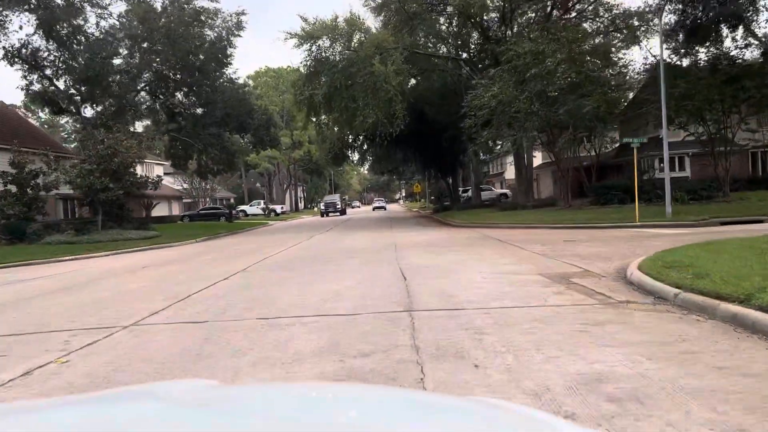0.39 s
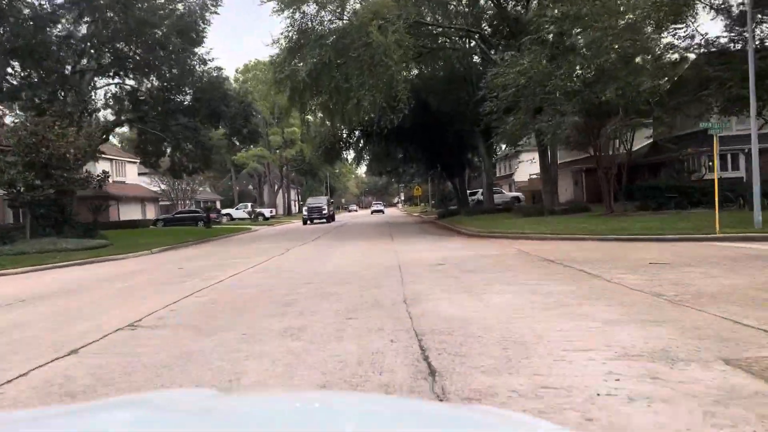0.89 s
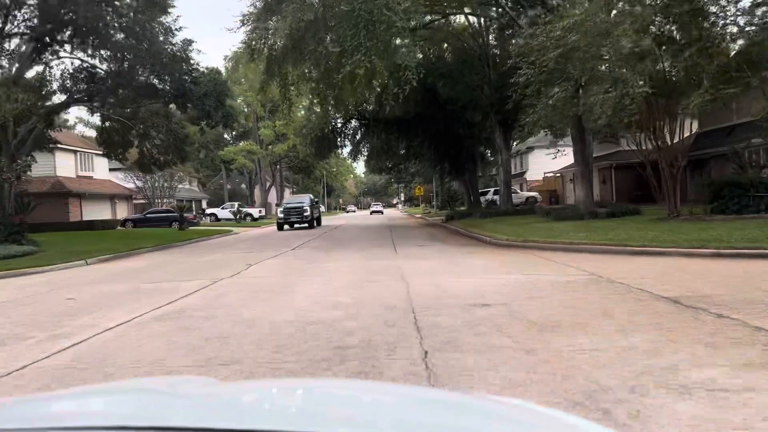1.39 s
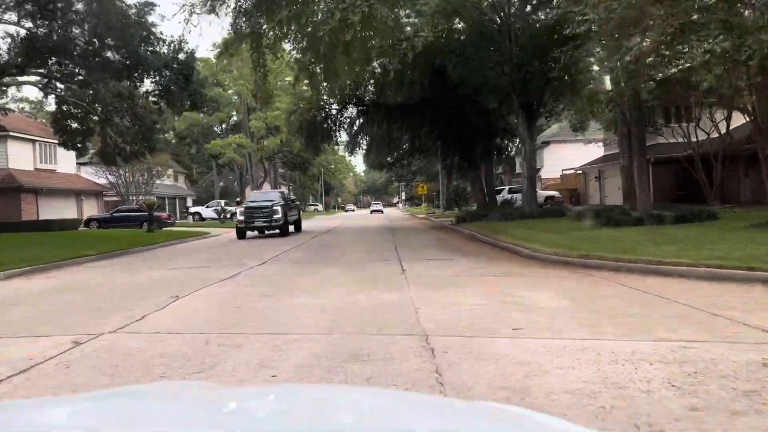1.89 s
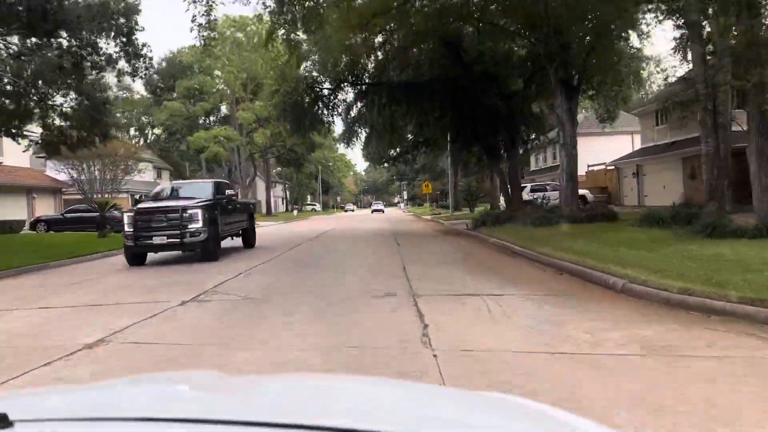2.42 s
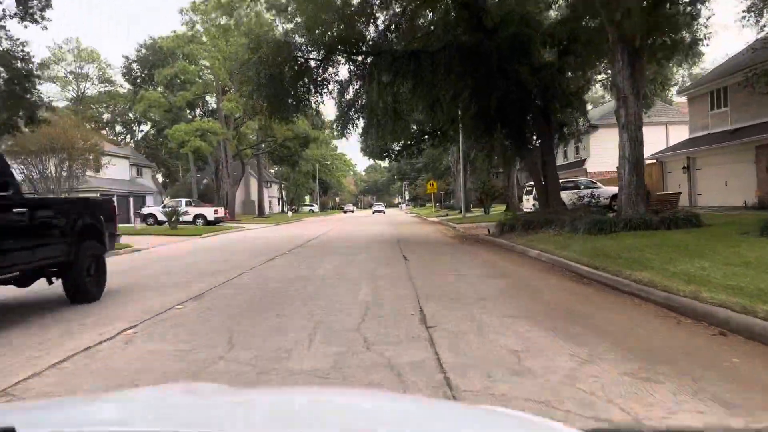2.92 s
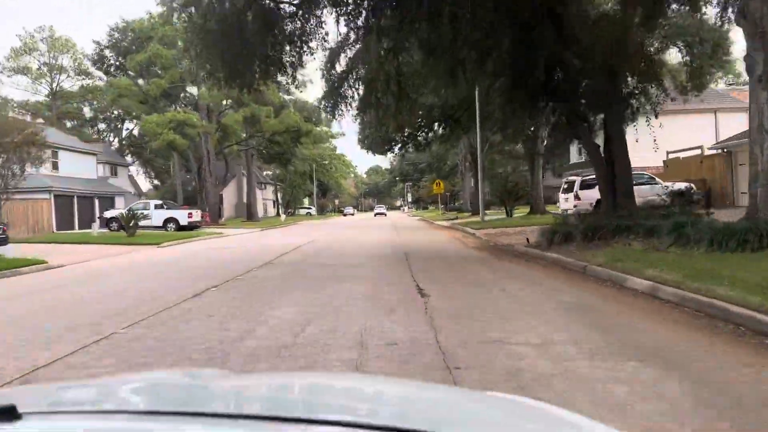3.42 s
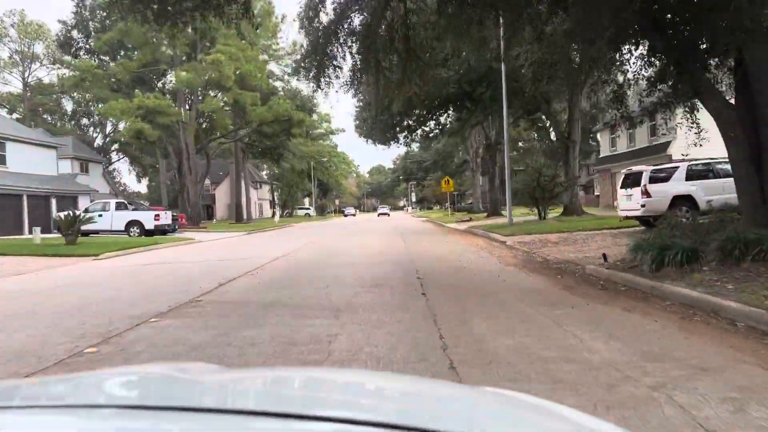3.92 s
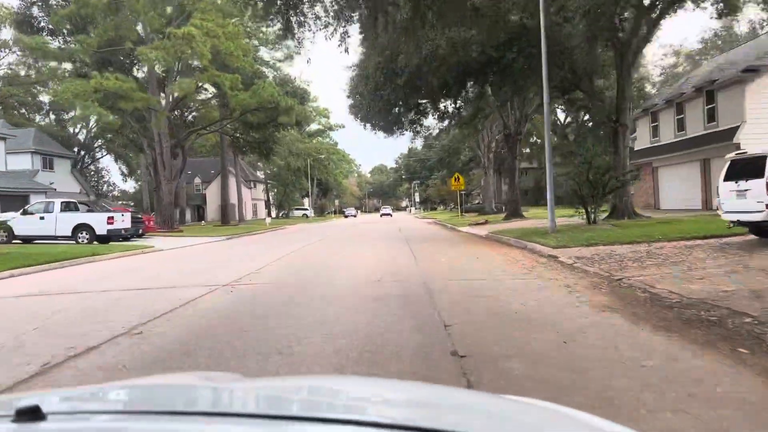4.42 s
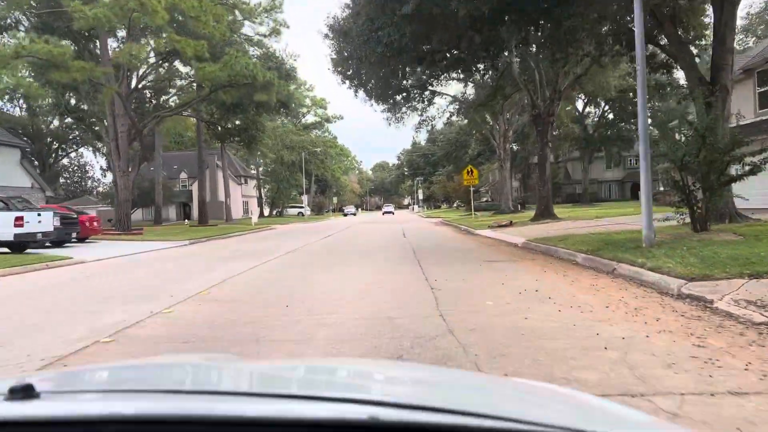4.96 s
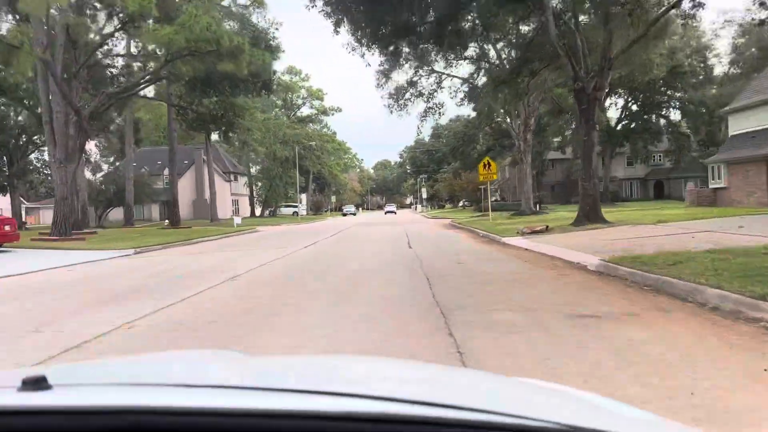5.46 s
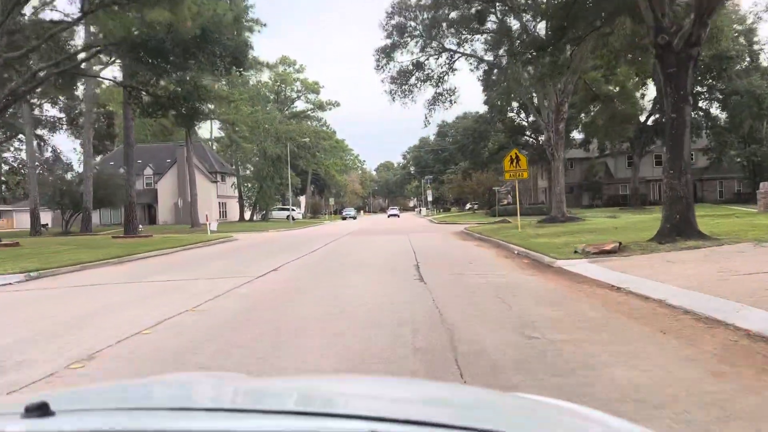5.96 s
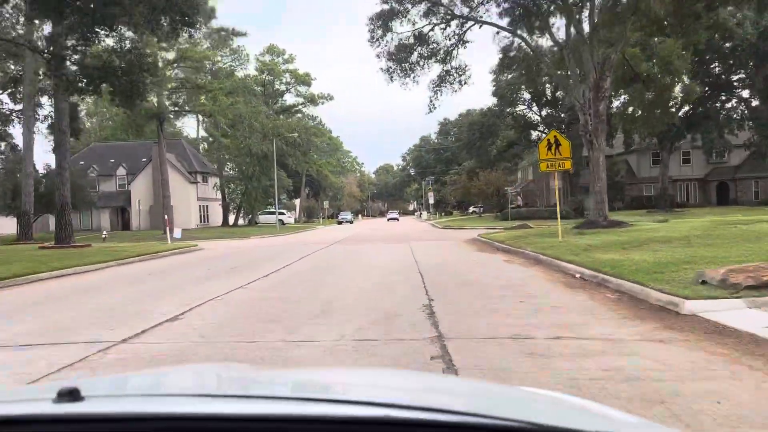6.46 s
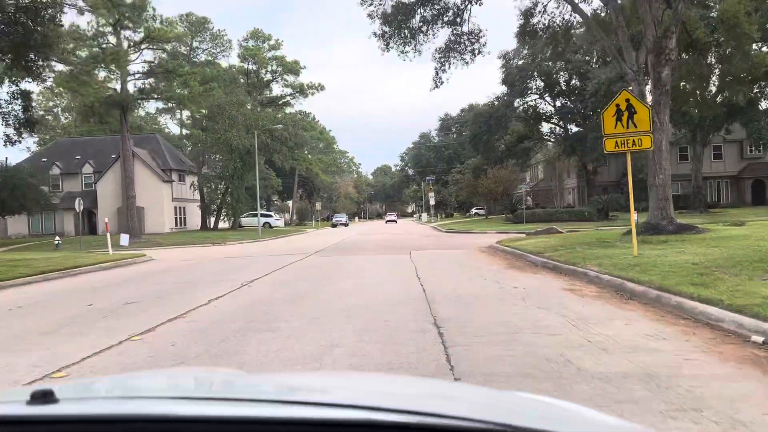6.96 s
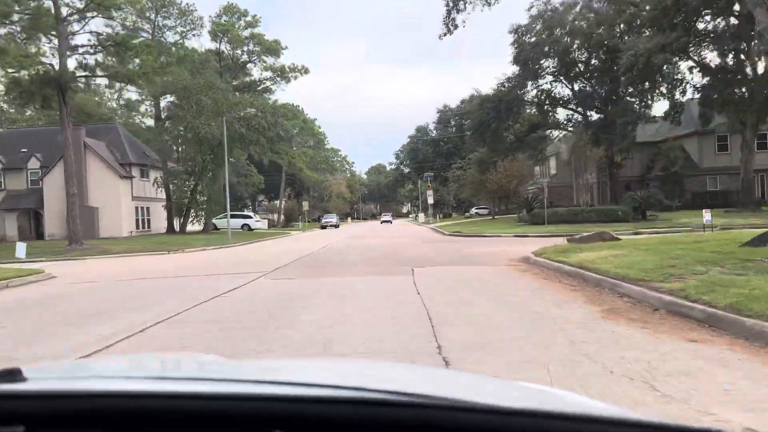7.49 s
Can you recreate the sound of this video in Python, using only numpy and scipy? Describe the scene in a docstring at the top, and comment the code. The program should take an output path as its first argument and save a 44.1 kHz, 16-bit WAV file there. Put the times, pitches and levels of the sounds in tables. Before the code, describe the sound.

A close cabin microphone hears a bass-heavy engine pull, then quieten and slide down as the driver changes up. Soft rubbing from the gear linkage fills the gap. The engine takes load again at a lower pitch, wobbling briefly, and gradually rises while gears whine more clearly. Road rumble, metallic buzz and breathy hiss continue, with occasional soft tyre thumps and a sharp trim tick at the end.

```python
"""Inside a small old car, shifting up

An air-cooled four behind the seats pulls, the driver shifts up, revs fall and climb again.
Firing tones boom in the cabin over filtered-noise rumble, roar and hiss; roar and hiss fade off throttle.
Gears whine on and off as unsteady sines, the linkage scuffs, tinware buzzes in shaky notes.
The suspension thumps over slab joints and trim ticks, both as decaying sines.
Two close microphone ports hear the bass nearly alike and the treble less so."""
import sys
import numpy as np
from scipy import signal
from scipy.fft import rfft, irfft
from scipy.io import wavfile
from scipy.ndimage import map_coordinates

SR = 44100
rng = np.random.default_rng(int(sys.argv[2]) if len(sys.argv) > 2 else 0)


def transcribe(signal):
    """Save signal, clipped to [-1, 1], as a 16-bit WAV file at the path in sys.argv[1]."""
    frames = np.atleast_2d(signal).T
    limited = np.clip(frames, -1, 1)
    pcm = np.round(limited * 32767).astype(np.int16)
    wavfile.write(sys.argv[1], SR, pcm)


def linear_from_db(decibels):
    """Turn decibels (scalar or array-like) into linear amplitude factors; 0 gives 1."""
    return 10 ** (np.asarray(decibels, float) / 20)


N = 335160
TIME = np.arange(N) / SR  # s
FREQ = np.maximum(np.arange(N // 2 + 1) * SR / N, 1)  # Hz, bins of the whole-length spectrum
LEFT_RIGHT = np.array([[.5], [-.5]])  # splits a left-minus-right difference between the ports


def curves(table):
    """Columns of a table, joined over time."""
    s, *columns = np.transpose(table)
    return [np.interp(TIME, s, c) for c in columns]


def over_hz(table, hz):
    """Columns of a table, joined over log frequency."""
    f, *columns = np.transpose(table)
    return [np.interp(np.log(hz), np.log(f), c) for c in columns]


def walk(rate):
    """Smooth random wander, spread near 1, through `rate` random knots per second."""
    knots = rng.standard_normal(int(N / SR * rate) + 4)
    # a cubic curve every 64 samples, straight lines between
    coarse = map_coordinates(knots, [np.arange(0, N + 64, 64) / SR * rate], order=3)
    return np.interp(np.arange(N) / 64, np.arange(len(coarse)), coarse)


def tone(cycles):
    """A sine of rms 1 from a running count of cycles, at a random phase."""
    return np.sqrt(2) * np.sin(2 * np.pi * (cycles + rng.random()))


def ports(shared, apart=0):
    """Two ports: a shared spectrum arrives shifted and tilted, mixed with what each port hears alone."""
    # How alike the two microphone ports hear. Each row: frequency in Hz, likeness 0-1,
    # left lead in rad, left minus right in dB.
    port_rows = [(30, .97, .45, -1.6), (62, .999, .58, -1), (130, .995, .32, .7), (250, .98, .38, .8),
                 (380, .85, .3, .5), (600, .75, 1.1, 1), (800, .8, 1.8, 1.2), (1050, .7, 1.5, 1),
                 (1400, .5, 2.3, -1.2), (2200, .45, 2.3, 0), (4000, .4, 1.2, 4), (9500, .5, .8, 6)]
    like, lead, tilt_db = over_hz(port_rows, FREQ)
    like = np.clip(like, 0, 1)
    if np.isscalar(apart):
        like = 1  # nothing heard alone
    together = np.sqrt(like) * np.exp(1j * LEFT_RIGHT * lead) * shared
    return linear_from_db(LEFT_RIGHT * tilt_db) * (together + np.sqrt(1 - like) * apart)


def noise(colour, flicker_db, flicker_rate, swell_db, ripple_db):
    """Stereo noise of rms 1 in half-octave bands that swell together and flicker alone."""
    # Panels that ring with the noise. Each row: frequency in Hz, width in Hz, boost in dB.
    panels = [(530, 60, 2.5), (690, 50, 2.5), (780, 55, 3.5), (1010, 100, 4), (1280, 130, 4.5),
              (2750, 150, 3), (4350, 130, 4)]
    db = over_hz(colour, FREQ)[0]
    db = db + sum(g / (1 + ((FREQ - f) / (w / 2)) ** 2) for f, w, g in panels)
    # countless small sheet-metal modes leave a fine ripple, a peak about every 60 Hz
    ripple = walk(SR / N * SR / 2 / 30)[:N:2]
    db = db + ripple_db * ripple[np.minimum(np.arange(len(FREQ)), N // 2 - 1)]
    white = rfft(rng.standard_normal((3, N)))  # one shared, one for each port alone
    spectrum = linear_from_db(db) * ports(white[0], white[1:])
    out, swell = 0, walk(2 * flicker_rate)
    loudest_db, octave = max(c[1] for c in colour), np.log2(FREQ)
    for centre in np.arange(4, 14, .5):
        if np.interp(centre, octave, db) > loudest_db - 45:  # skip inaudible bands
            share = np.cos(np.pi * np.clip(octave - centre, -.5, .5)) ** 2
            gain = linear_from_db(flicker_db * walk(flicker_rate) + swell_db * swell)
            out = out + gain * irfft(share * spectrum, N)
    return out / np.sqrt(np.mean(np.mean(out, axis=0) ** 2))


def engine(hz, load_db):
    """Firing tone and its multiples ring the cabin; uneven cylinders add orders that wander in strength."""
    # Cabin boom on the firing tone and its second and third multiples.
    # Each row: frequency in Hz, level in dB before the load and source trims.
    boom = [(53, -22), (57, -13.5), (63, -11.5), (70, -13.5), (80.5, -19.5), (87, -13), (94, -13),
            (108, -26), (124, -26.5), (137, -20), (160, -20.5), (173, -22.5), (184, -18.5), (196, -17),
            (210, -22.5), (250, -24), (265, -33.5), (285, -26.5)]
    # Uneven cylinders and exhaust runs. Each row: multiple of the firing rate,
    # level in dB before load and cabin.
    orders = [(0.499, -34.5), (0.752, -30.5), (1.25, -28), (1.5, -40), (1.75, -31.5), (2.25, -43),
              (2.5, -40.5), (2.75, -27.5), (3.25, -35), (3.5, -40), (3.75, -36), (4, -31.5), (5, -45)]
    # How the cabin passes those orders. Each row: frequency in Hz, gain in dB.
    cabin = [(30, -13), (60, -4.5), (115, 3), (150, -1.5), (190, 3.5), (250, 2), (280, -12.5), (305, 3),
             (335, -1.5), (375, -4), (430, -14)]
    # The driveline shudders as the clutch bites. One row: start in seconds, shudder rate in Hz,
    # swing of the firing rate in Hz, swing of the firing tone in dB, decay time constant in seconds.
    shudder_row = (1.97, 4.6, 3.5, 3.0, .55)
    first_db, second_db, third_db = (over_hz(boom, order * hz)[0] for order in (1, 2, 3))
    # dB for each dB of load: uneven orders and overtones thin out off throttle
    uneven_db, thin_db = 0.37 * load_db, .2 * load_db
    s, shudder_hz, swing_hz, swing_db, fade = shudder_row
    age = np.maximum(TIME - s, 0)
    shudder = np.sin(2 * np.pi * shudder_hz * age) * np.exp(-age / fade)
    hz, first_db = hz + swing_hz * shudder, first_db + swing_db * shudder
    third_db = third_db - 4  # weaker at the source
    firings = np.cumsum(hz * (1 + .003 * walk(25))) / SR
    out = linear_from_db(first_db + 0.47 * walk(12)) * tone(firings)
    out = out + linear_from_db(second_db + thin_db + 3 * walk(12)) * tone(2 * firings)
    out = out + linear_from_db(third_db + thin_db + 3 * walk(12)) * tone(3 * firings)
    for order, db in orders:
        order_db = db + uneven_db + over_hz(cabin, order * hz)[0] + 3.5 * walk(7)
        out = out + linear_from_db(order_db) * tone(order * firings)
    return out


def gears():
    """Meshing teeth sing slightly unsteady notes that creep upward, swelling in and out."""
    # Gear whine, one row each time it sings. Each row: start and end in seconds (at half gain),
    # start and end pitch in Hz, rms level in dB around which it wanders.
    whines = [(0, 1.101, 769, 796, -51), (2.199, 3.856, 669, 693, -45.5),
              (3.998, 6.505, 532.5, 543.7, -50.5), (5.197, 7.601, 357, 385, -38.5),
              (6.154, 7.598, 766.1, 793.9, -40.5), (6.305, 7.606, 742, 760, -45.5),
              (6.599, 7.601, 676, 690, -45.5)]
    fade_s = 0.22  # half of the whole fade
    out = 0
    for start, end, start_hz, end_hz, db in whines:
        hz = np.interp(TIME, [start, end], [start_hz, end_hz])
        gate = np.clip(np.minimum(TIME - start, end - TIME) / (2 * fade_s) + .5, 0, 1)
        cycles = np.cumsum(hz * (1 + .011 * walk(45))) / SR
        out = out + gate * linear_from_db(db + 3 * walk(14)) * tone(cycles)
    return out


def tinware():
    """Loose sheet metal buzzes in narrow shaky notes that come and go."""
    # Each row: pitch in Hz, level in dB relative to the hiss, around which it wanders.
    buzzes = [(2330, -22), (2700, -16.5), (2900, -19), (3500, -19.5)]
    out = 0
    for hz, db in buzzes:
        cycles = np.cumsum(hz * (1 + .012 * walk(60))) / SR
        out = out + linear_from_db(db + 4 * walk(4) + 3 * walk(40)) * tone(cycles)
    return out


def road_rumble(hz):
    """Low noise from the body, which rumbles harder at higher revs."""
    # Each row: frequency in Hz, relative density in dB per Hz.
    rumble_colour = [(22, -23.5), (38, -4), (60, 2), (85, -7), (120, 0), (190, -6), (250, -10),
                     (290, -13.5), (370, -13.5), (440, -35), (600, -47.5), (1000, -86.5)]
    rumble_db = -22.5 + 1.5 * np.log2(hz / 62.6)  # 1.5 dB per octave of firing rate, from 62.6 Hz
    return linear_from_db(rumble_db) * noise(rumble_colour, flicker_db=1.5, flicker_rate=5.2, swell_db=0.37, ripple_db=-0.5)


def roar(load_db, rubbing):
    """Mid-range noise that follows the throttle, joined by the body of the linkage scuffs."""
    # Each row: frequency in Hz, relative density in dB per Hz.
    roar_colour = [(300, -24), (420, -1), (600, -3), (845, -3.5), (1000, -3), (1110, -5), (1300, -5.5),
                   (1650, -9), (2000, -23.5), (2600, -44), (4000, -91)]
    steady = linear_from_db(-39 + 0.62 * load_db)
    gain = np.hypot(steady, linear_from_db(13) * rubbing)  # scuffs are 13 dB louder here than in the hiss
    return gain * noise(roar_colour, flicker_db=.8, flicker_rate=12, swell_db=.5, ripple_db=1.8)


def clatter(hz):
    """Gain that throbs at the firing rate and, four times slower, with the valve gear on the camshaft."""
    turn = 2 * np.pi * np.cumsum(hz) / SR
    return 1 + .12 * np.cos(turn) + .1 * np.cos(turn / 4 + walk(3))


def engine_hiss(hz, hiss_db, rubbing):
    """Treble noise that throbs with the clatter, joined by the scrape of the linkage scuffs."""
    # Each row: frequency in Hz, relative density in dB per Hz.
    hiss_colour = [(800, -68.5), (1300, -24), (1900, -0.5), (3000, -6), (4430, -8.5), (6000, -11),
                   (7600, -16.5), (9000, -24.5), (9800, -35)]
    gain = np.hypot(linear_from_db(hiss_db) * clatter(hz), rubbing)
    return gain * noise(hiss_colour, flicker_db=0.76, flicker_rate=15, swell_db=0.73, ripple_db=2.0)


def top_hiss():
    """Thin noise at the very top, independent of the throttle."""
    # Each row: frequency in Hz, relative density in dB per Hz.
    top_colour = [(7000, -31.5), (9200, -14.5), (9550, 1), (9900, 1.5), (11000, -60.5)]
    return linear_from_db(-78.0) * noise(top_colour, flicker_db=3.0, flicker_rate=33, swell_db=1.5, ripple_db=3)


def scuffs():
    """Gain of short rubbing bursts from the gear linkage, quick to start and slower to fade."""
    # Each row: time in seconds (the burst starts half a length earlier),
    # length in seconds, peak gain in dB in the hiss band.
    rubs = [(1.173, 0.067, -59.5), (1.325, 0.025, -58.5), (1.408, 0.078, -59.5), (1.537, 0.09, -60.5),
            (1.683, 0.034, -68), (2.041, 0.16, -59), (5.663, .06, -57)]
    out = 0
    for s, length, db in rubs:
        age = np.maximum(TIME - s + length / 2, 0) / (length / 3)
        out = out + linear_from_db(db) * age * np.exp(1 - age)
    return out


def thumps():
    """At a slab joint a soft tyre blow makes the body bounce for a few cycles."""
    # Each row: start in seconds, level in dB (the envelope peaks 4.6 dB above it), bounce in Hz.
    joints = [(1.28, -25.5, 44.6), (2.619, -25, 84.9), (3.422, -23.5, 73.9), (7.122, -22, 45.1)]
    out = 0
    for s, db, hz in joints:
        age = np.maximum(TIME - s, 0)
        envelope = (age / 0.023) * np.exp(1 - age / 0.039)
        out = out + linear_from_db(db) * envelope * np.sin(2 * np.pi * hz * age)
    return out


def trim():
    """Hard plastic snaps and rings for a few milliseconds."""
    # Each row: start in seconds, level in dB, left minus right in dB.
    ticks = [(5.4534, -18, 7.5), (7.5236, -11, -3.5)]
    # Modes of the plastic. Each row: frequency in Hz, level in dB, time to fall 60 dB in seconds.
    modes = [(1560, 0, .013), (1900, -12, .008), (3300, -15, .003), (4200, -10, .003), (6200, -16, .004)]
    out = 0
    for s, db, pan_db in ticks:
        age = np.maximum(TIME - s, 0)
        ring = 0
        for hz, g, t60 in modes:
            ring = ring + linear_from_db(g) * np.exp(-np.log(1000) * age / t60) * np.sin(2 * np.pi * hz * age)
        out = out + linear_from_db(db + LEFT_RIGHT * pan_db) * ring * (1 - np.exp(-age / .001))
    return out


def scene():
    """Tones reach both ports as one wave; the noises part towards the treble."""
    # Engine speed before shudder and jitter. Each row: time in seconds, firing rate in Hz.
    revs = [(0.0, 85.7), (0.3, 90.96), (0.78, 92), (1.06, 94.2), (1.2, 87.1), (1.61, 62.93), (1.8, 53.37),
            (2.01, 58.95), (2.41, 57.31), (5.57, 65.09), (6.1, 65.17), (6.43, 67.53), (7.6, 69.77)]
    # Throttle. Each row: time in seconds, engine load in dB.
    throttle = [(0, -0.5), (.9, 1.5), (1.07, 2.5), (1.13, -5), (1.25, -9.5), (1.6, -13), (1.93, -12.5),
                (2.14, -9), (2.25, -5.5), (3.1, -3.5), (5.6, -1), (6.25, -0.5), (7.6, -0.5)]
    hz, load_db, rubbing = curves(revs)[0], curves(throttle)[0], scuffs()
    hiss_db = -54 + load_db
    tones = engine(hz, load_db) + gears() + thumps() + linear_from_db(hiss_db) * tinware()
    body = irfft(ports(rfft(tones)), N)
    noises = road_rumble(hz) + roar(load_db, rubbing) + engine_hiss(hz, hiss_db, rubbing) + top_hiss()
    return body + noises + trim()


def band_limit(x):
    """A steep low-pass at the top of the band."""
    return signal.sosfilt(signal.butter(12, 9940, fs=SR, output="sos"), x)


def record(dry):
    """The recorder fades in over a few milliseconds, rounds the loudest peaks and cuts the top."""
    fade_in = np.sin(np.pi / 2 * np.minimum(TIME / .006, 1)) ** 2
    rounded = np.tanh(0.6 * dry * fade_in) / 0.61
    low_pass = signal.ellip(10, .2, 80, 9780, fs=SR, output="sos")  # ripple and stop in dB, edge in Hz
    return band_limit(signal.sosfilt(low_pass, rounded))


dry = scene()
out = record(dry)
transcribe(out)
```